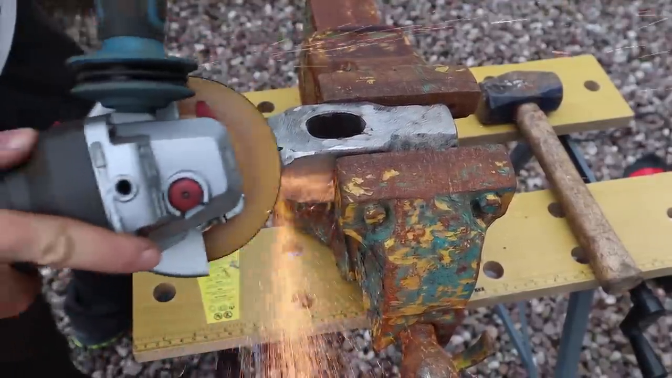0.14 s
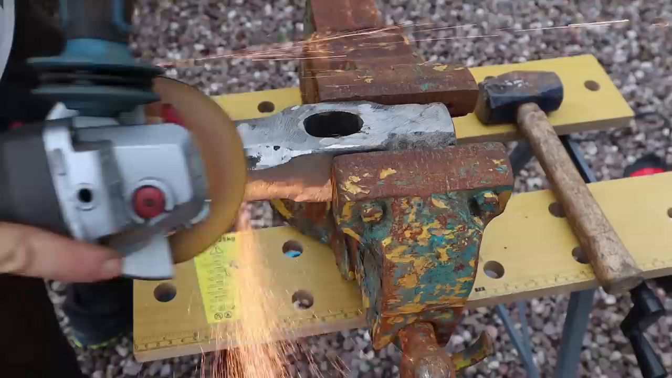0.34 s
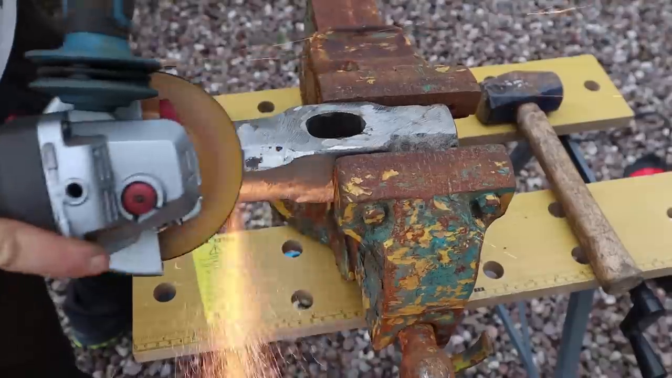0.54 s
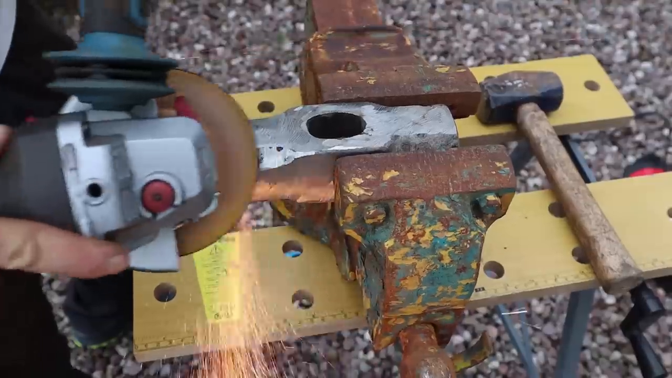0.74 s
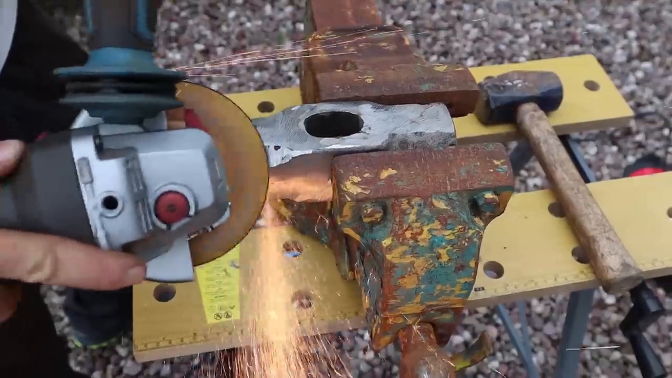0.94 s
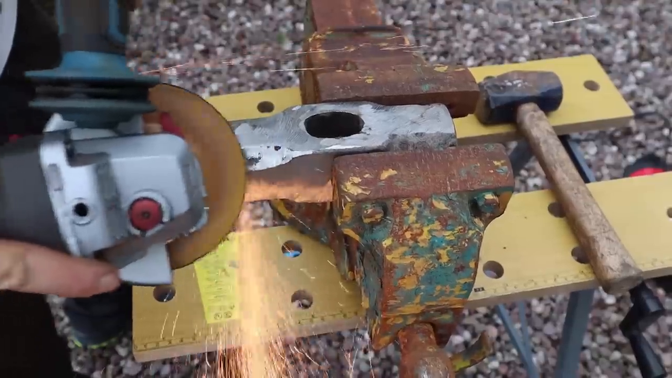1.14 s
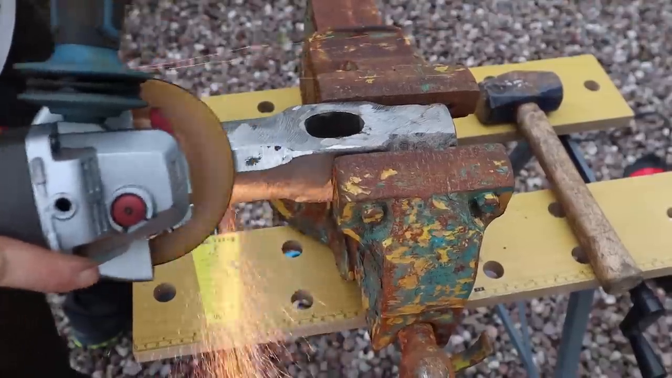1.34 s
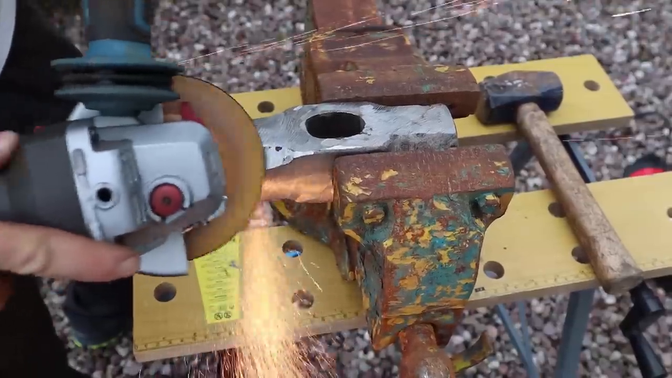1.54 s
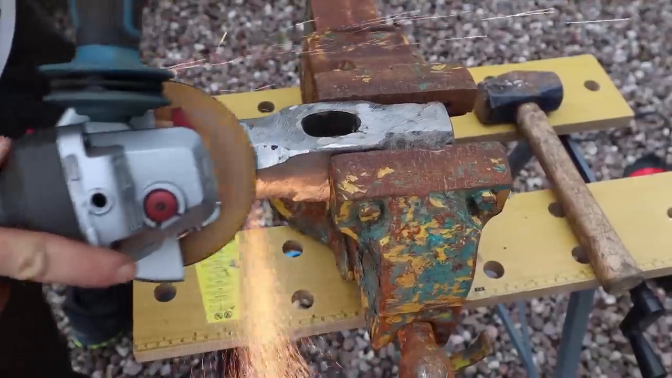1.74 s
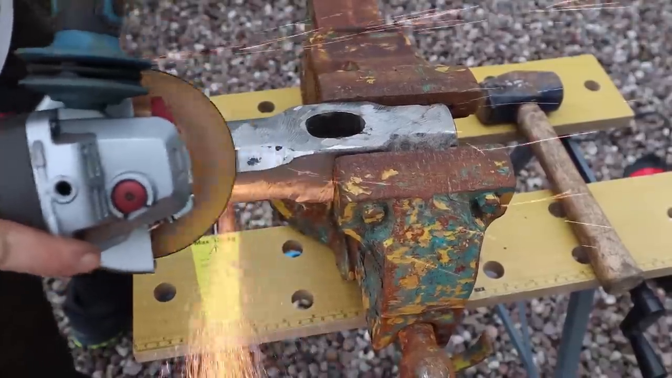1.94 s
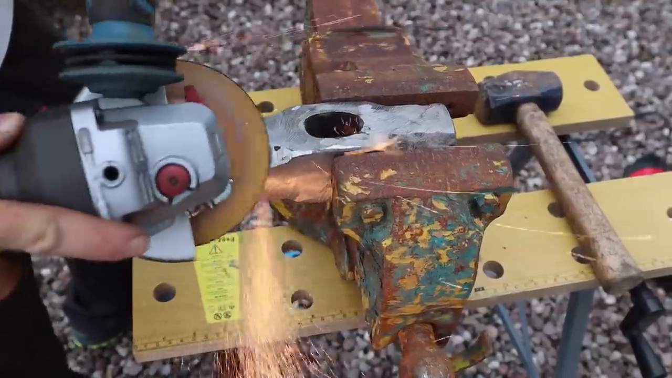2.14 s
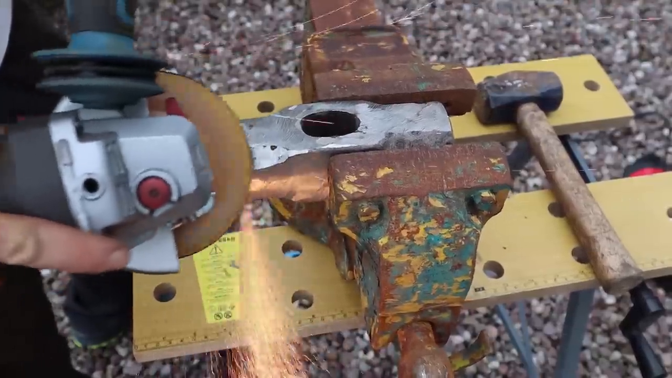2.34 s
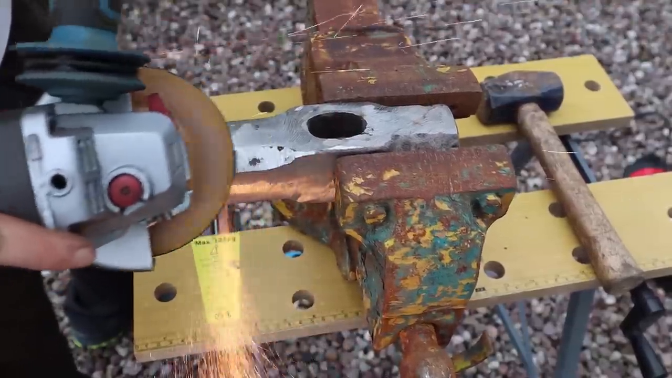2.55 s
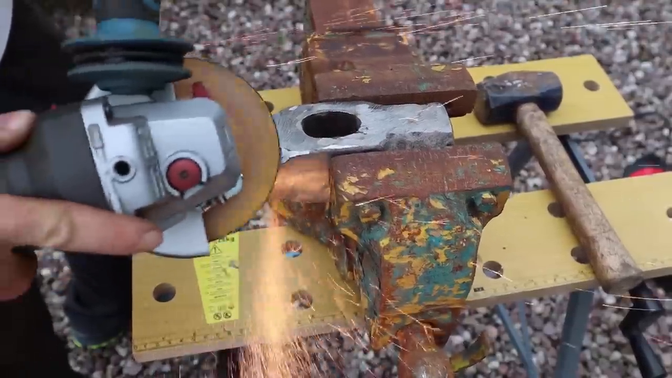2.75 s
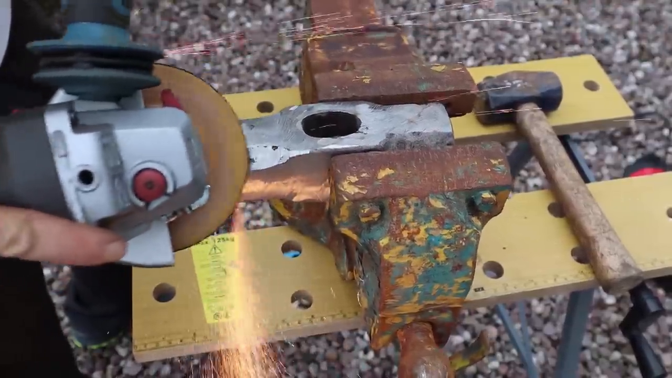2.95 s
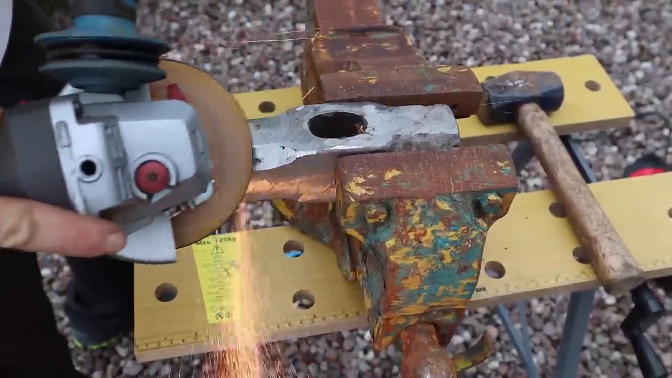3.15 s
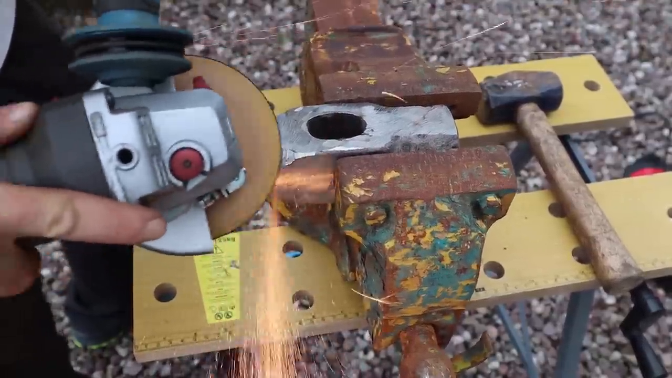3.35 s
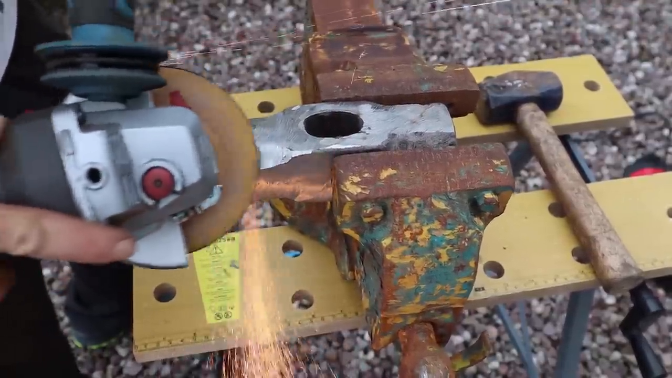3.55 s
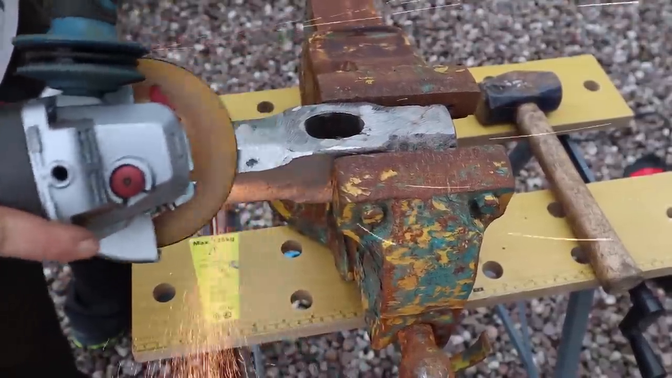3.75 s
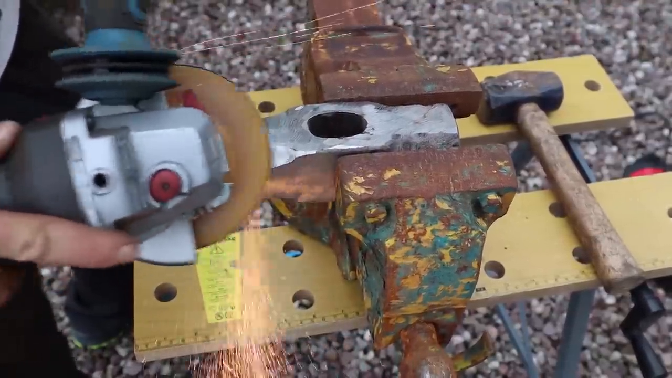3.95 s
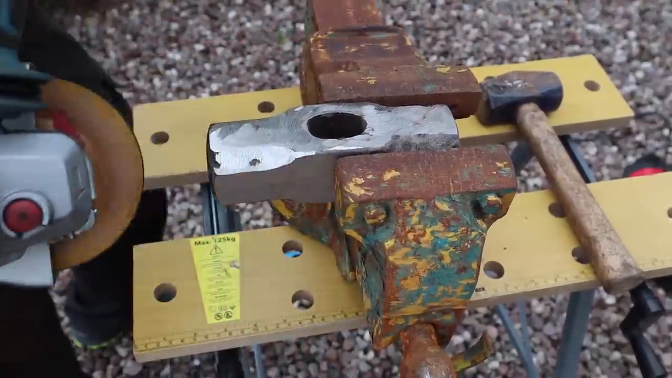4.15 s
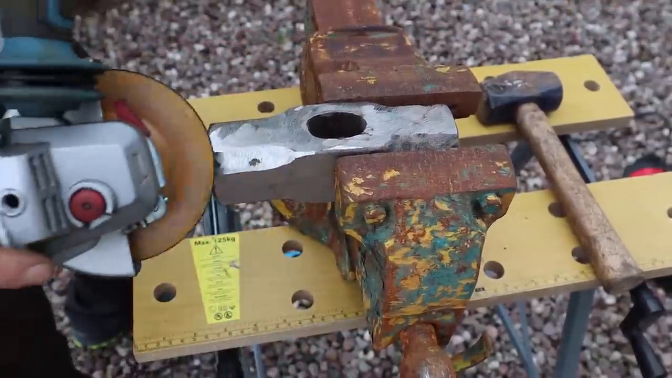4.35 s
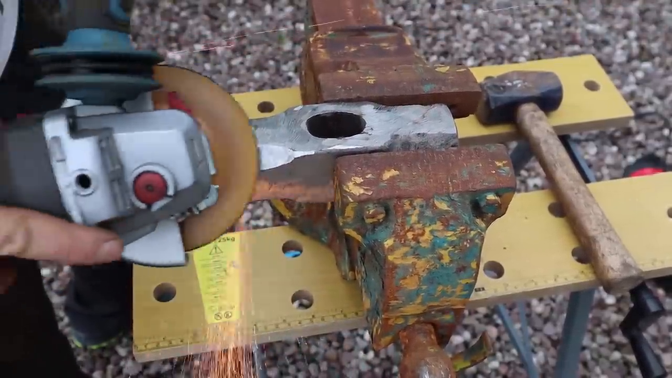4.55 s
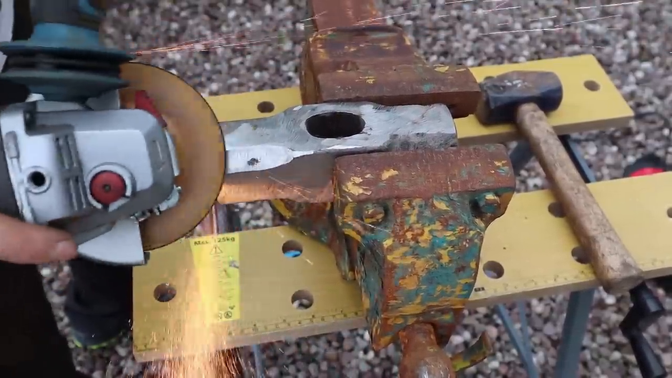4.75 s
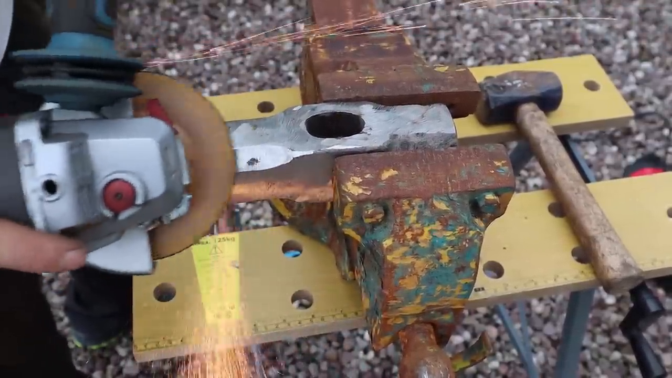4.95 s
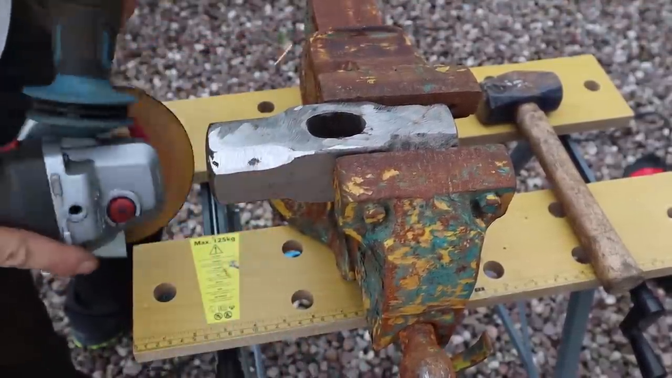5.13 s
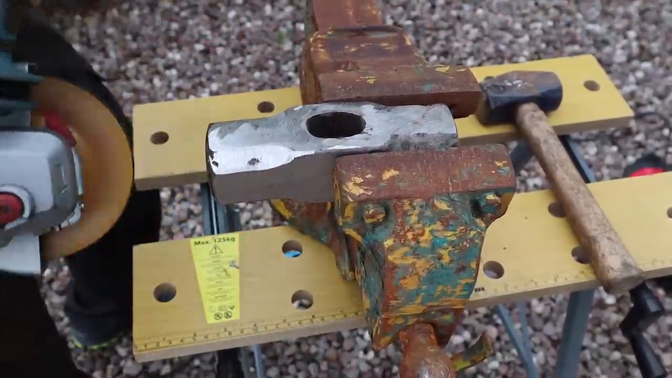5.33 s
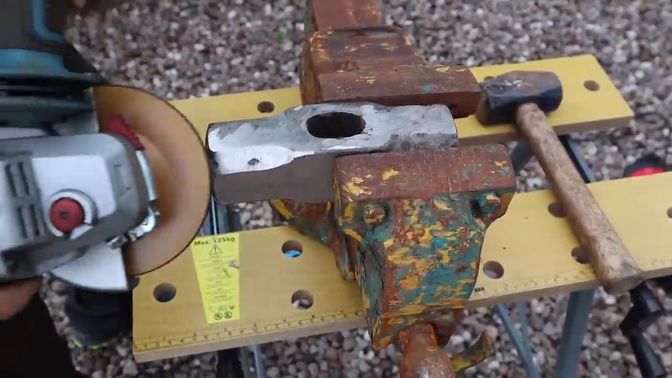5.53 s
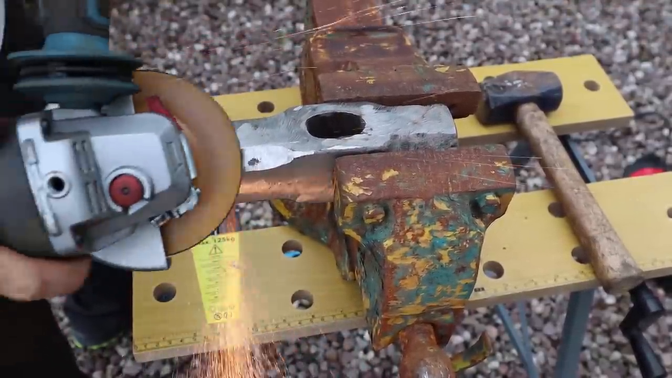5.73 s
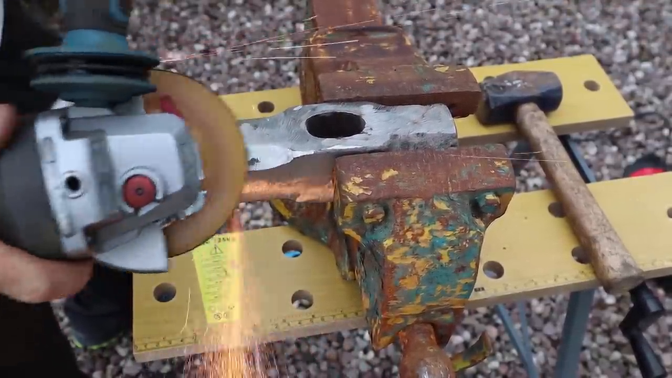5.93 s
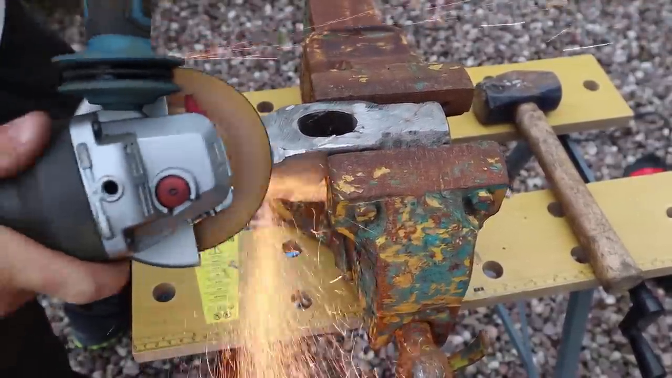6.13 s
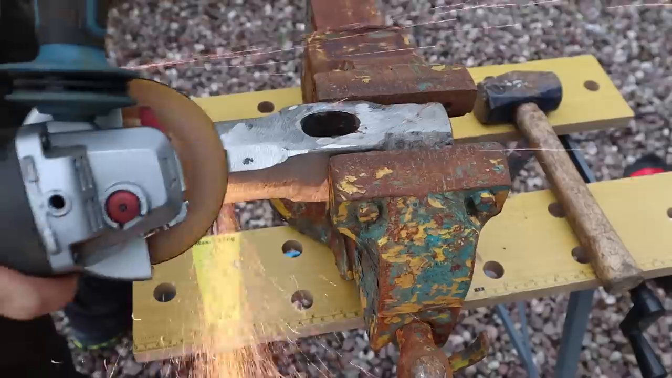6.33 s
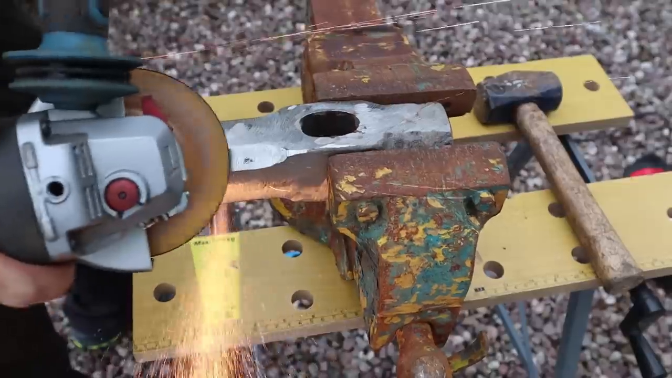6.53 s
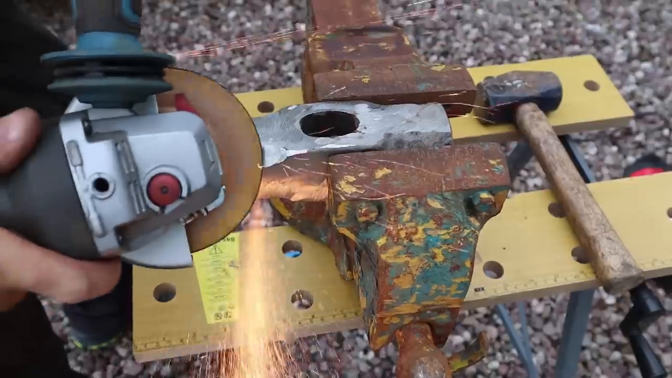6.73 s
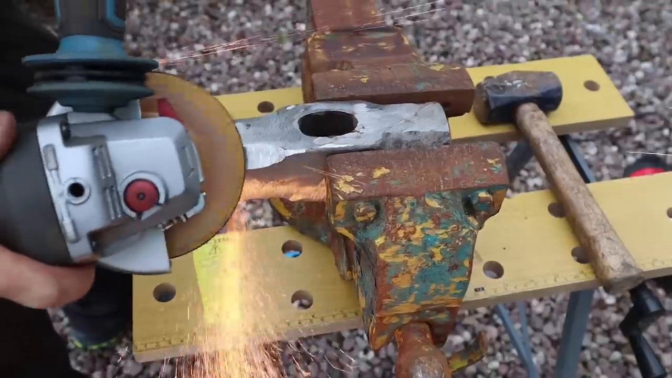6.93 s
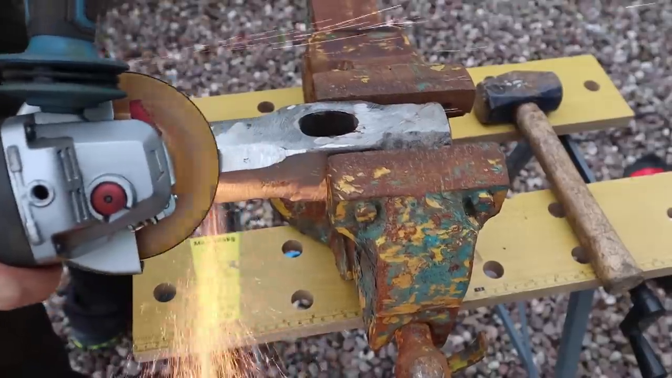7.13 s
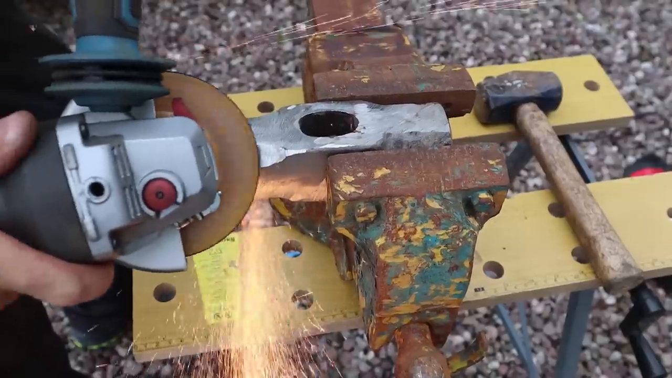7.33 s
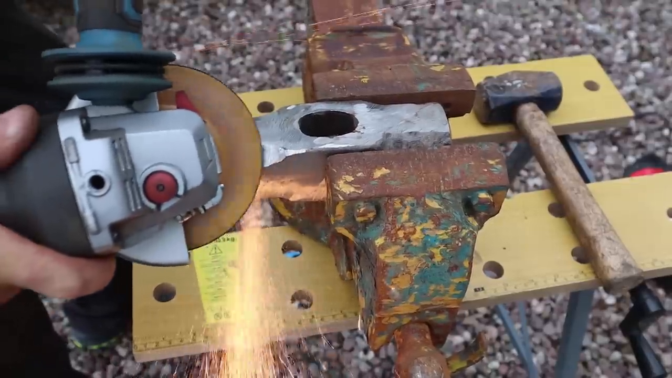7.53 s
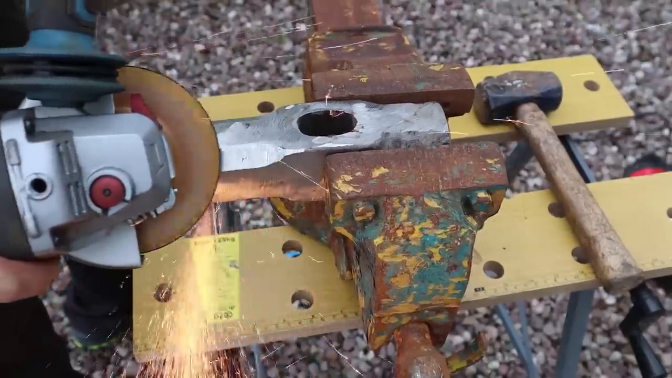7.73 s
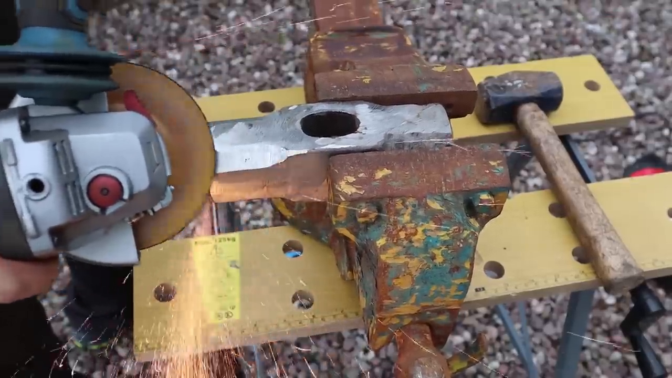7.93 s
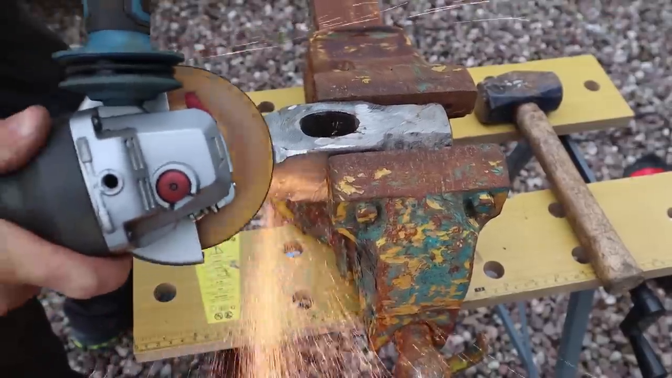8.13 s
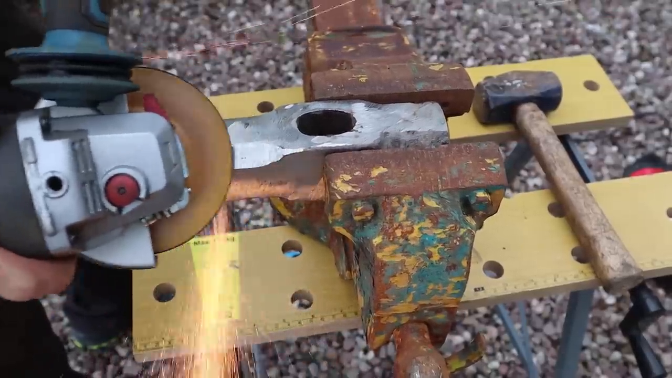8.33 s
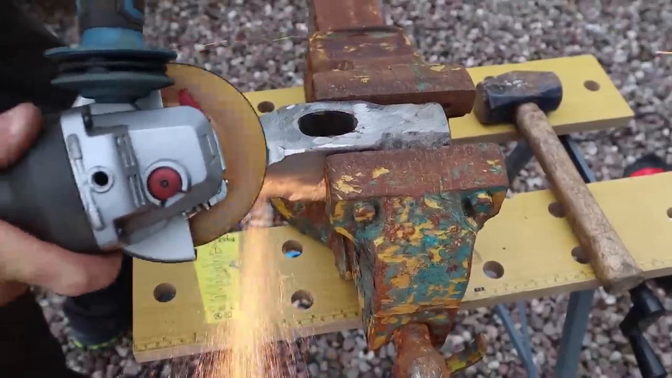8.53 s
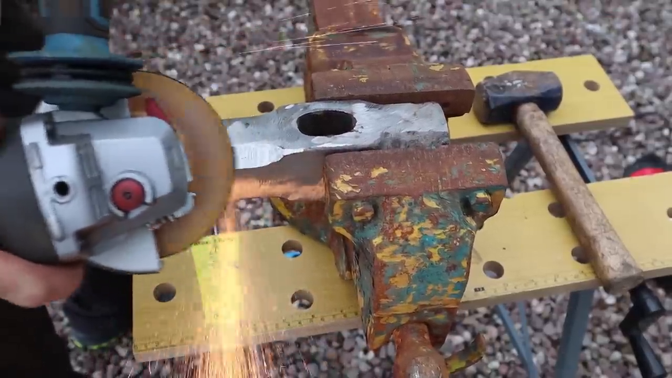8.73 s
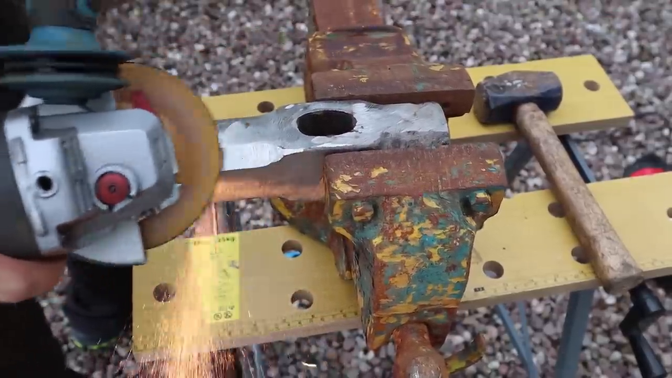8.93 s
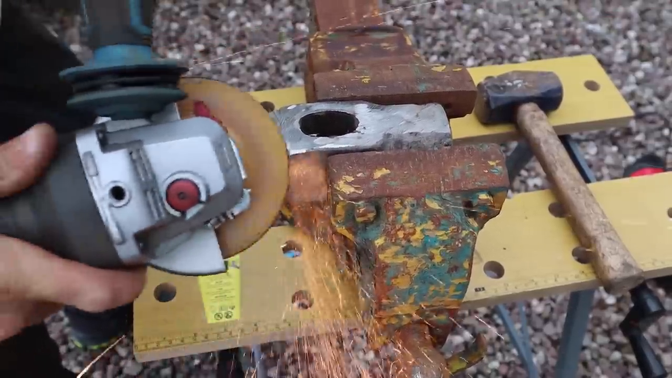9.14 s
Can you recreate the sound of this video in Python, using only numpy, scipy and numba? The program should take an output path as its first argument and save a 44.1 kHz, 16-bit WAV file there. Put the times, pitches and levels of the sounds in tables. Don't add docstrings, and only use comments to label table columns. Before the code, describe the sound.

Close, gritty metal grinding with a bright buzzing ring, motor whine and soft wind thumps, broken by two brief lift-offs and rattling landings.

```python
import sys
import numpy as np
from scipy import signal
from scipy.fft import rfft, irfft
from scipy.io import wavfile
from scipy.ndimage import uniform_filter1d
from numba import njit

SR = 44100
rng = np.random.default_rng(int(sys.argv[2]) if len(sys.argv) > 2 else 0)


def gain_from_db(level_db):
    decades = np.asarray(level_db, float) / 20
    return 10 ** decades


def to_wav(sig):
    pcm = np.clip(np.atleast_2d(sig), -1, 1) * 32767
    pcm = np.round(pcm).astype(np.int16)
    wavfile.write(sys.argv[1], SR, pcm.T)


N = 404838
T = np.arange(N) / SR
PINION, CROWN, MAINS_HZ = 9, 32, 50
LOADED_REV_PER_S, FREE_REV_PER_S = 490.5, 576

# time in seconds, turns per second.
SPEED_REV_PER_S = [(0.0, 560), (0.25, 522), (0.6, 492), (0.95, 527), (1.7, 518), (2.25, 504), (3.1, 490),
                   (4.1, 544), (4.4, 564), (4.6, 620), (5.1, 553), (5.73, 606), (5.9, 584), (6.2, 534),
                   (6.475, 517), (6.95, 474), (7.7, 478), (9.18, 516)]
# start in seconds, end in seconds.
CONTACTS_S = [
    (0.0, 4.13),
    (4.557, 5.125),
    (5.749, 9.2),
]
# time in seconds, pressure change in dB, length in seconds,
# share of the upper disc modes from 0 to 1.
PUSHES_DB = [(0.02, 1, 0.1, 0.67), (0.203, 4.5, 0.2, 0.9), (0.5, 3.5, 0.19, 0.8), (0.78, 4.5, 0.14, 0.8),
             (1.035, 4, 0.051, 0.86), (1.449, -4.5, 0.09, 0.77), (1.577, 2.5, 0.19, 0.67),
             (1.94, 3, 0.14, 0.73), (2.202, 3.1, 0.14, 0.6), (2.339, -20, 0.062, 0.7),
             (2.477, 3, 0.27, 0.67), (2.7, -5, 0.06, 0.3), (2.844, 4, 0.077, 0.74),
             (2.998, -3.5, 0.06, 0.48), (3.12, 2.5, 0.12, 0.61), (3.86, -4.5, 0.094, 0.9),
             (4.87, -3.8, 0.063, 0.46), (4.97, 5, 0.027, 0.9), (5.915, 5, 0.21, 0.75),
             (6.213, 4.5, 0.24, 0.8), (6.35, -4.5, 0.096, 0.58), (6.842, 4.5, 0.064, 0.5),
             (6.95, -2.5, 0.061, 0.49), (7.216, -1.5, 0.33, 0.8), (7.472, 5, 0.11, 0.6),
             (7.664, -4, 0.099, 0.39), (7.96, -1, 0.48, 0.82), (8.485, -5, 0.099, 0.4),
             (9.066, -3.1, 0.1, 0.55)]
# time in seconds, peak level in dB.
SKIPS_DB = [
    (1.388, -2),
    (4.0519, -4),
    (4.06, -4),
    (4.0714, -9),
    (4.0824, -4),
    (4.5089, 2),
    (4.531, -1),
    (4.5477, -1.5),
    (5.721, 0),
    (5.7367, -0.5),
]
# centre in Hz, width in Hz, level in dB.
DISC_MODES = [
    [(3440, 290, 3.5), (3790, 200, -2)],
    [(4400, 530, 8), (3970, 190, -1), (4200, 910, -14)],
]
# centre in Hz, width in Hz, level in dB.
GRIT_MODES = [(7635, 186, 5.5), (8080, 770, -4.5), (9600, 880, -2), (10940, 450, 0), (12880, 880, -4.5),
              (13220, 700, -11), (14460, 880, -4), (15300, 900, -13)]
STEEL_MODES = [(2851, 91, 3), (2720, 960, -15.5)]
GUARD_MODES = [(5154, 340, 12.5), (5320, 140, -11)]
FACE_MODES = [(2400, 49, 3), (2290, 280, -11.5)]
RIM_MODES = [(6434, 153, 0)]
VICE_MODES = [(1292, 360, 4.5), (1640, 380, 2.5)]
BENCH_MODES = [(768, 20, 0), (700, 50, -9)]
# level against resting pressure in dB, share of pressure changes followed,
# rise in dB per % of extra speed.
DISC_LAW = (0, 1.28, 0.083)
GRIT_LAW = (-6.5, 0.47, 0.12)
STEEL_LAW = (-13.5, 0.36, 0.33)
GUARD_LAW = (-2.75, 0.2, 0.23)
FACE_LAW = (-12.5, 0.49, .02)
RIM_LAW = (-14.5, 0.97, .15)
# time in seconds, change in dB.
TWISTS_DB = [(0.13, -4), (0.73, 6), (0.81, -17), (0.89, 6), (1.07, -4.5), (1.34, -5.5), (1.52, 2.5),
             (1.62, -8), (1.79, -17), (2.0, 4), (2.34, 2), (2.62, 5.5), (2.91, 4.5), (3.71, -6),
             (4.02, -6.5), (4.6, -10), (4.87, -7), (5.02, -11), (5.78, -8), (6.83, 6), (7.41, 3), (7.83, 4),
             (8.34, 6.5), (8.74, 2), (8.93, -8)]
# time in seconds, rise in dB, length in seconds.
EDGES_DB = [(0.02, 6, 0.057), (0.56, -3, .06), (0.82, 5, 0.048), (0.96, 7.5, 0.074), (1.22, 2, 0.051),
            (1.57, 5, 0.099), (1.9, 8, 0.095), (2.18, 12.5, 0.069), (2.47, 1, 0.19), (2.62, -4, .06),
            (2.81, 4, 0.036), (3.46, 3, .07), (3.98, 1.5, 0.11), (6.44, 9, .08), (6.65, 5.5, .4),
            (7.0, -2, 0.17), (7.45, 4, .15), (8.1, 8, .07), (8.61, 9.5, 0.064), (8.72, 3, 0.089)]
# time in seconds, rise in dB, length in seconds.
FLATS_DB = [(0.03, 3, .08), (0.24, 4, 0.069), (0.56, 5, .07), (0.8, -1, .07), (0.96, 6, .06),
            (1.32, 10, 0.04), (2.22, 0, 0.12), (2.49, 9, .06), (2.81, 7, 0.059), (3.19, 1, 0.048),
            (3.7, 9, 0.061), (4.01, 8, 0.077), (4.79, 2, .07), (5.8, 6, 0.09), (6.22, 7, 0.053),
            (6.56, 4, 0.065), (6.85, 5, .08), (7.48, 6, 0.1), (8.13, 7, .06), (8.25, 7, 0.089),
            (8.35, 11, 0.071), (8.6, 13.5, 0.056), (8.95, 9, 0.1)]
# multiple of armature speed, level in dB.
MESH_DB = [(PINION - 1, -27), (PINION, 0), (PINION + 1, -6.5), (PINION + 3, -22)]
HUM_DB = list(zip((1, PINION / CROWN), [-52.5, -50.5]))
# frequency in Hz, level in dB per Hz.
AIR_DB = [(200, -61), (350, -19), (520, -14.5), (680, -11), (950, -13), (1350, -3), (2000, -7.5),
          (2750, -3), (3400, -6.5), (4300, -1), (4750, -3), (6300, -8.5), (8500, -19), (13000, -18.5),
          (16000, -26)]
# time in seconds, gear change in dB, air change in dB, length in seconds.
SWINGS_DB = [
    (4.29, 4, 2, 0.041),
    (4.39, 3, 1, .08),
    (4.44, -10, 0.5, 0.062),
    (5.21, -10, 1.5, .05),
    (5.25, -1, -1, 0.31),
    (5.27, 1, 2.5, 0.062),
    (5.34, -15, -0.5, 0.09),
    (5.46, 2.5, 3, 0.039),
    (5.53, 1, 1, .1),
    (5.61, -12, -1, .06),
]
# start in seconds, end in seconds, frequency in Hz, level in dB.
BEARING = (4.5, 9, 14375, -56)
# frequency in Hz, level in dB per Hz.
WIND_DB = [(12, -34), (20, 4.5), (112, 3), (206, -10), (284, -14), (377, -27), (467, -17), (500, -26),
           (650, -49), (1100, -120)]
# time in seconds, rise in dB, length in seconds.
GUSTS_DB = [(0.44, 3, 0.25), (0.78, -6, 0.088), (1.25, 15, 0.23), (1.5, 25, 0.26), (1.7, 11, 0.07),
            (1.91, 14, 0.13), (2.04, 3.8, 0.098), (2.26, 15, 0.068), (2.4, 5, 0.08), (2.51, 9.5, 0.099),
            (2.64, 11.8, 0.5), (2.85, 9.4, 0.2), (3.21, 8.5, 0.082), (3.36, 6, 0.12), (3.75, 5.1, 0.14),
            (4.01, 10, 0.5), (4.3, 9, 0.073), (4.54, 5, 0.08), (4.84, 7.5, 0.39), (5.31, 8.5, 0.6),
            (5.56, 10.5, 0.08), (5.96, 13, 0.14), (6.17, -2, 0.25), (6.62, 10, 0.08), (6.8, 11.3, 0.086),
            (6.94, 8, 0.084), (7.12, 12, 0.15), (7.61, 11.5, 0.47), (7.75, 8.5, 0.055), (8.45, 6.5, 0.27)]


def unit(x):
    return x / np.sqrt(np.mean(x ** 2))


def curve(rows, column=1):
    rows = np.array(rows)
    return np.interp(T, rows[:, 0], rows[:, column])


def swells(rows, column=1, length_s=None):
    return sum(r[column] * np.exp(-(2 * (T - r[0]) / (length_s or r[-1])) ** 2) for r in rows)


def walk(rate_hz):
    k = int(SR / rate_hz)
    held = np.repeat(rng.standard_normal(N // k + 1), k)
    return 2.2 * uniform_filter1d(uniform_filter1d(held, k), k)[:N]


def coloured(points):
    hz, db = np.transpose(points)
    f = np.fft.rfftfreq(N, 1 / SR) + 1
    gain = gain_from_db(np.interp(np.log(f), np.log(hz), db))
    return unit(irfft(rfft(rng.standard_normal(N)) * gain, N))


@njit
def svf(x, hz, width_hz):
    y, b, l = np.empty(len(x)), 0., 0.
    g, k = np.tan(np.pi * hz / SR), width_hz / hz
    for i in range(len(x)):
        v = (b + g * (x[i] - l)) / (1 + g * (g + k))
        b, l, y[i] = 2 * v - b, l + 2 * g * v, k * v
    return y


def ring(x, modes, waver_db):
    total = np.zeros(N)
    for k, (hz, width_hz, db) in enumerate(modes):
        tone = svf(svf(x, 1. * hz, 1. * width_hz), 1. * hz, 3.2 * width_hz)
        total += (-1) ** k * gain_from_db(db + waver_db * walk(25)) * tone
    return unit(total)


def surface(turn, keep, size):
    keep = np.clip(keep, 0, .98)
    fresh = rng.standard_normal((1600, size))
    worn = signal.lfilter([np.sqrt(1 - keep ** 2)], [1, -keep], fresh, axis=0).ravel()
    return np.interp(turn * size, np.arange(worn.size), worn)


def touching(edge_size):
    on = sum(1. * (T >= a) * (T <= b) for a, b in CONTACTS_S)
    return uniform_filter1d(on, size=edge_size, mode="nearest")


def pressure_db():
    settle_db, settle_s = -2.5, .12
    airborne_db, airborne_s = -8, .012
    hand = swells([(s, db, length_s) for s, db, length_s, _ in PUSHES_DB])
    settling = swells([(s, settle_db, settle_s) for s, _ in CONTACTS_S[1:]])
    airborne = swells([(s - airborne_s / 2, airborne_db, airborne_s) for s, _ in SKIPS_DB])
    return hand + settling + airborne


def contact(turn):
    spot_db, chatter_db, lump_db = 6.6, 1.7, 2.2
    spot = spot_db * np.cos(2 * np.pi * (turn + 0.04 * walk(30))) * np.clip(1 + 0.25 * walk(9), 0, 3)
    chatter = chatter_db * surface(turn, keep=0.31, size=1)
    lumps = lump_db * surface(turn, keep=0.83, size=14)
    bear = gain_from_db(spot + chatter + lumps)
    return bear / np.sqrt(uniform_filter1d(bear ** 2, size=2200))


def grinding(turn):
    rest_db, rest_share = -22, 0.72
    bear = contact(turn)
    phase = (turn + 0.0029 * walk(60) + .5) % 1 - .5
    proud = unit(np.exp(-(phase / 0.0011) ** 2))
    worn = unit(surface(turn, keep=0.803, size=320)) + 0.7 * proud
    fresh = rng.standard_normal(N)
    coarse = bear * (worn + 0.55 * fresh)
    fine = bear ** 0.95 * (0.22 * worn + fresh)

    share_rows = [(s, share - rest_share, length_s) for s, _, length_s, share in PUSHES_DB]
    share = np.clip(rest_share + swells(share_rows), .12, .88)
    flat_db = swells(FLATS_DB)
    low, high = (ring(coarse, modes, .8) for modes in DISC_MODES)
    disc = np.sqrt(1 - share) * gain_from_db(0.5 * flat_db) * low + np.sqrt(share) * high

    bite_db = 1.3 * walk(14) - 0.27 * T
    twist_db = swells(TWISTS_DB, length_s=.07)
    layers = [
        (disc, DISC_LAW, 0),
        (ring(fine, GRIT_MODES, 1.33), GRIT_LAW, bite_db),
        (ring(coarse + 0.23 * fine, STEEL_MODES, 1.0), STEEL_LAW, 0),
        (ring(coarse + 1.4 * fine, GUARD_MODES, 0.57), GUARD_LAW, twist_db),
        (ring(coarse + 0.1 * fine, FACE_MODES, 0.67), FACE_LAW, swells(EDGES_DB)),
        (ring(fine, RIM_MODES, 1.6), RIM_LAW, flat_db),
    ]
    push_db = pressure_db()
    extra_pct = 100 * (curve(SPEED_REV_PER_S) / LOADED_REV_PER_S - 1)
    mix = np.zeros(N)
    for part, (db, follow, db_per_pct), own_db in layers:
        mix += gain_from_db(rest_db + db + follow * push_db + db_per_pct * extra_pct + own_db) * part

    vice = gain_from_db(-13) * ring(coarse, VICE_MODES, 0.76) + gain_from_db(-22) * ring(fine, BENCH_MODES, 1.0)
    return touching(edge_size=90) * (mix + gain_from_db(0.28 * push_db - 26.0) * vice)


def casing_level(column, loaded_db, free_db, db_per_pct):
    extra_pct = 100 * (curve(SPEED_REV_PER_S) / FREE_REV_PER_S - 1)
    free_db = free_db + db_per_pct * extra_pct + swells(SWINGS_DB, column=column)
    loaded_db = loaded_db + .2 * pressure_db()
    return gain_from_db(free_db + touching(edge_size=2000) * (loaded_db - free_db))


def gears(rev, beat):
    knock = gain_from_db(16.0 * np.cos(np.pi * beat) ** 4 + 2.2 * surface(beat + .5, keep=.1, size=1))
    teeth = np.zeros(N)
    for k, db in MESH_DB:
        angle = 2 * np.pi * k * rev
        teeth += gain_from_db(db) * ((.9 + walk(550)) * np.cos(angle) + walk(550) * np.sin(angle))
    rattle = unit(svf(knock * teeth, 5560.0, 1300.0))
    return casing_level(1, loaded_db=-35, free_db=-30, db_per_pct=0.16) * rattle


def cooling_air(beat):
    air = unit(coloured(AIR_DB) * gain_from_db(.8 * np.cos(2 * np.pi * beat) + 0.55 * walk(10)))
    return casing_level(2, loaded_db=-30.5, free_db=-32, db_per_pct=0.36) * gain_from_db(6.5) * air


def motor(rev):
    beat = 2 * MAINS_HZ * T + 0.5
    hum = sum(np.sqrt(2) * gain_from_db(db + 1.24 * walk(16)) * np.sin(2 * np.pi * k * rev) for k, db in HUM_DB)
    start_s, stop_s, hz, db = BEARING
    squeal = gain_from_db(db + 2.5 * walk(10)) * np.sin(2 * np.pi * hz * T) * (T > start_s) * (T < stop_s)
    return gears(rev, beat) + cooling_air(beat) + hum + squeal


def wind():
    breeze_db, eddy_db = -45.5, 2.0
    return gain_from_db(breeze_db + swells(GUSTS_DB)) * unit(coloured(WIND_DB) * gain_from_db(eddy_db * walk(22)))


def skips():
    attack_s, decay_s = 0.0002, 0.0042
    grit = rng.standard_normal(N)
    body = gain_from_db(-1.5) * ring(grit, DISC_MODES[0] + DISC_MODES[1], 0.)
    body += gain_from_db(-5) * ring(grit, GRIT_MODES + RIM_MODES, 0.)
    body += gain_from_db(-4) * ring(grit, STEEL_MODES + FACE_MODES, 0.)
    body += gain_from_db(-1.5) * ring(grit, GUARD_MODES, 0.)
    out = np.zeros(N)
    u = np.arange(600) / SR
    envelope = (1 - np.exp(-u / attack_s)) * np.exp(-(u / decay_s) ** 2)
    for s, db in SKIPS_DB:
        i = int(s * SR)
        burst = body[i:i + len(u)] * envelope
        out[i:i + len(u)] += gain_from_db(db - 2.0) * burst / np.abs(burst).max()
    return out


def scene():
    rev = np.cumsum(curve(SPEED_REV_PER_S)) / SR
    turn = rev * PINION / CROWN
    return (grinding(turn) + motor(rev) + wind() + skips())[None]


def roll_off(x):
    return signal.sosfilt(signal.butter(12, 16530, fs=SR, output="sos"), x)


def record(dry):
    peak, bend, low_hz, top_hz = .9, .62, 22, 15810
    x = (1 - np.exp(-bend * peak * np.tanh(dry / peak))) / bend
    x = signal.sosfilt(signal.butter(2, low_hz, "high", fs=SR, output="sos"), x)
    x = irfft(rfft(x) * (np.fft.rfftfreq(N, 1 / SR) < top_hz), N)
    return roll_off(x)


dry = scene()
out = record(dry)
to_wav(out)
```